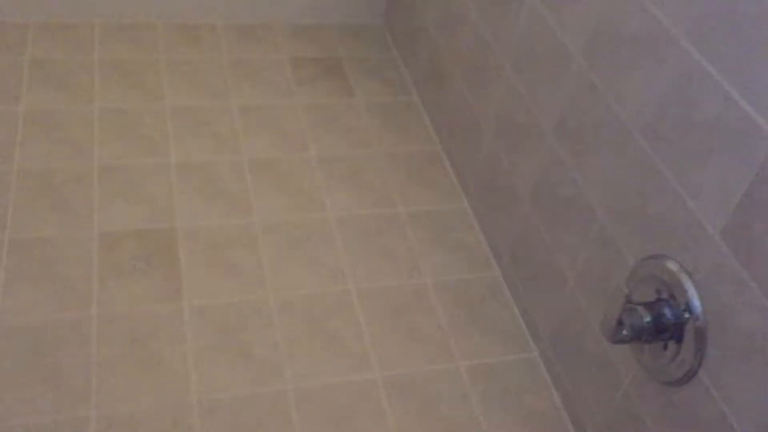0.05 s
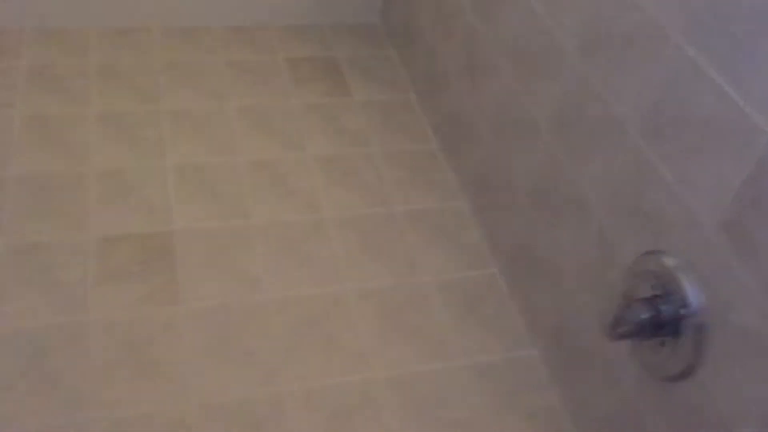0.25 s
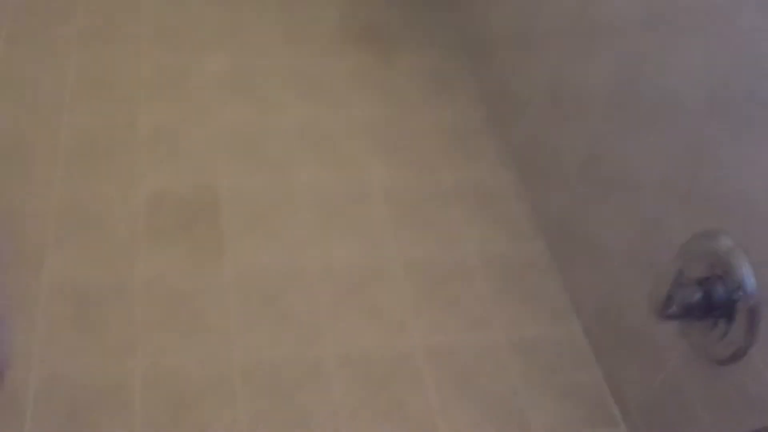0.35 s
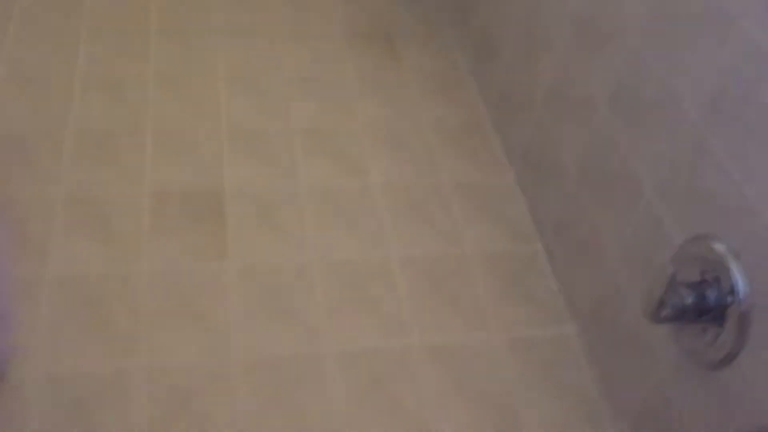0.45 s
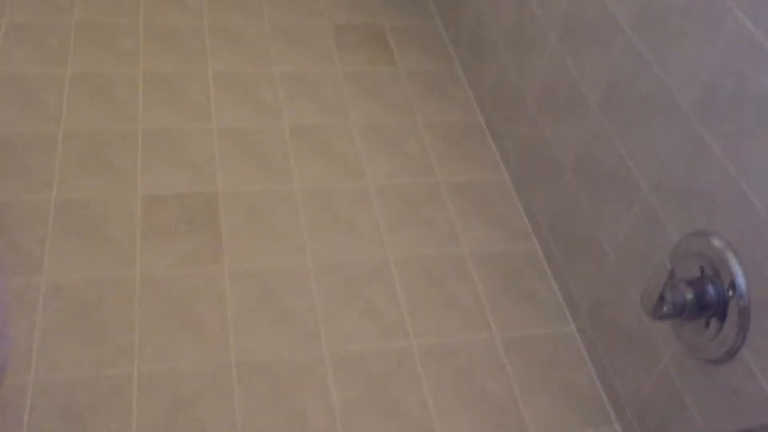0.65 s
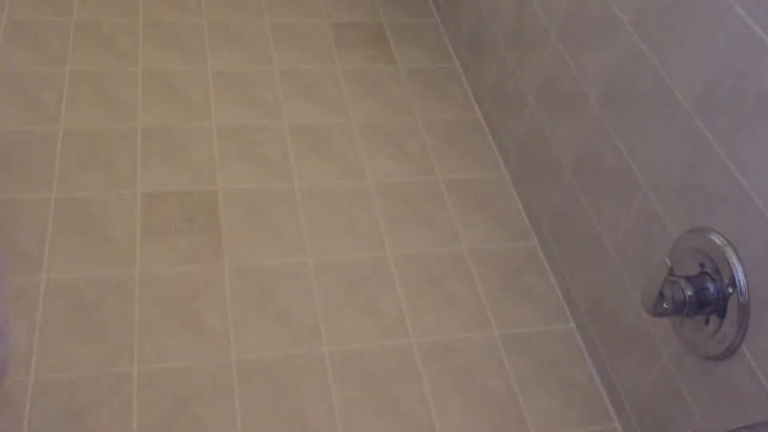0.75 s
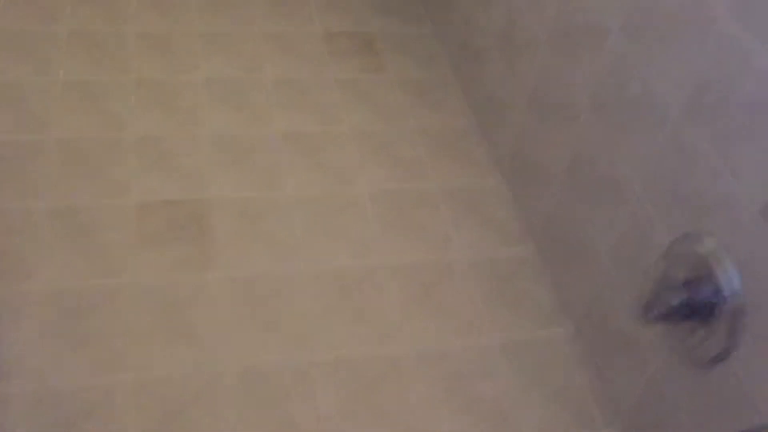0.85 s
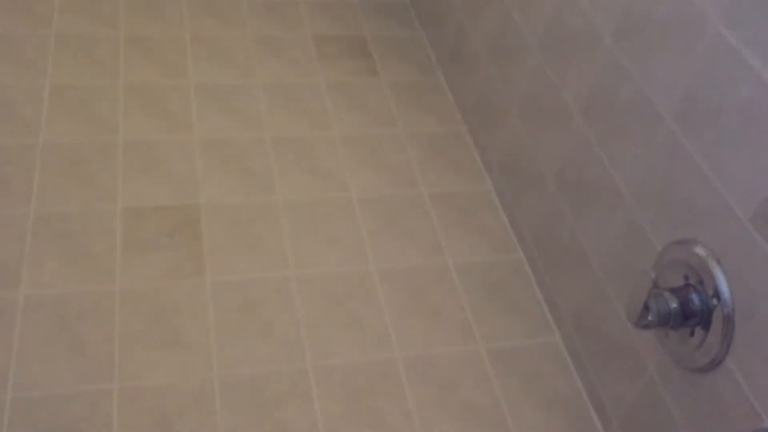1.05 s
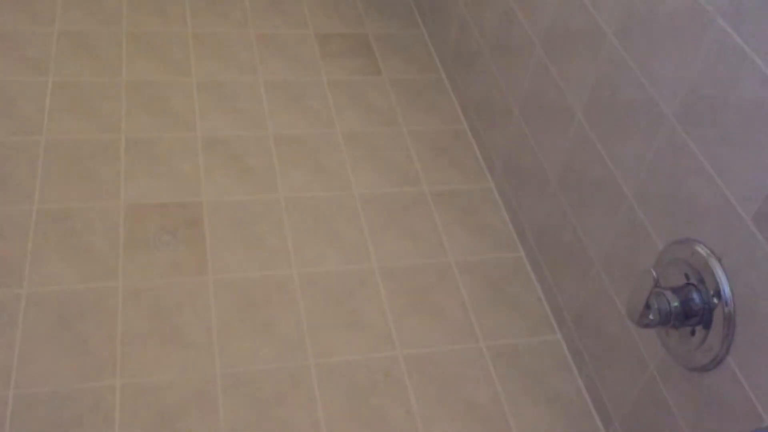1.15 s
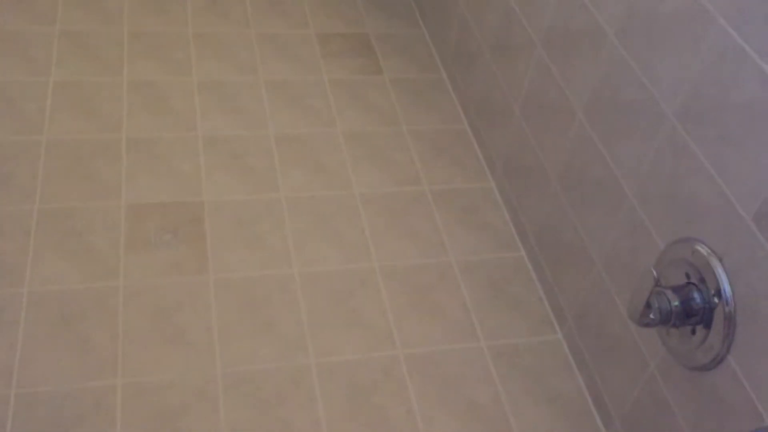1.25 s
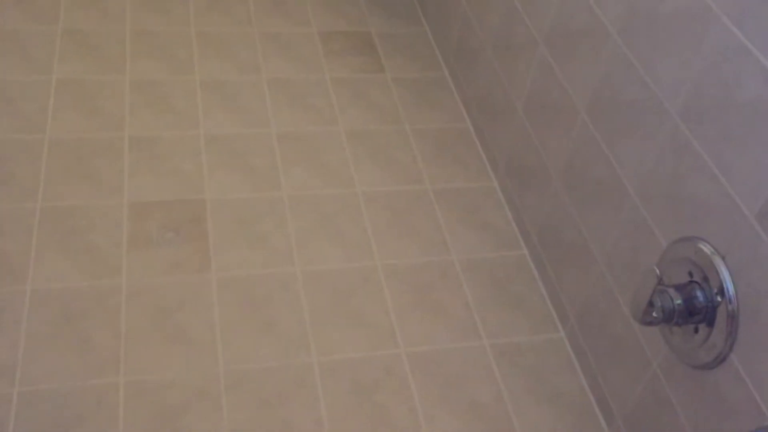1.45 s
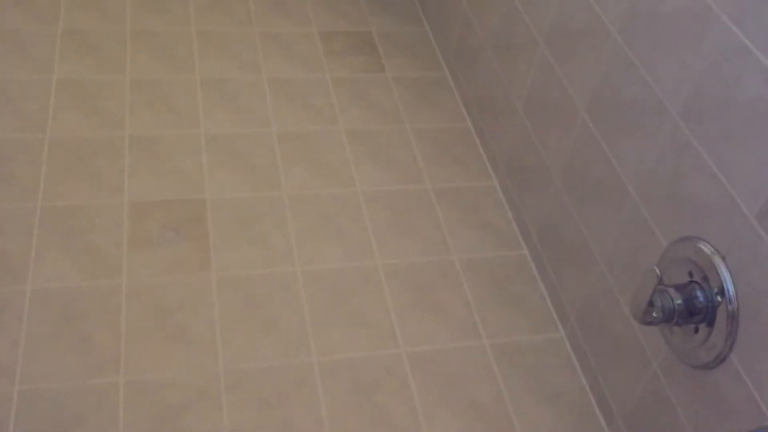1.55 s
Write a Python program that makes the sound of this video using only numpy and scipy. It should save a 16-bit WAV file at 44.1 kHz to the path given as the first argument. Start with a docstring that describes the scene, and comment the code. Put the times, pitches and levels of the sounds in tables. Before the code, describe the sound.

A phone case is bumped and set down, a hard double knock, then one echoing tap

```python
"""Knocks on the case of a hand-held phone, shifted and propped up in a small tiled room: short pushes ring its modes.
Sine bursts make dull bumps and hollow tones; filtered noise makes short gritty bursts, dry ticks and hard taps.
The taps, and more faintly the knocks and ticks, also excite a dense echo of decaying noise bands, the tiles.
Under it lie a steady hiss, a rumble whose level flickers, and a faint broad hiss that comes and goes."""
import sys
import numpy as np
from scipy import signal
from scipy.fft import rfft, irfft
from scipy.io import wavfile
from scipy.ndimage import uniform_filter1d

SR = 44100
rng = np.random.default_rng(int(sys.argv[2]) if len(sys.argv) > 2 else 0)


def generate_wav(sig):
    """Save sig (samples, or channels by samples) to the path in sys.argv[1] as 16-bit PCM at SR."""
    pcm = np.round(np.clip(np.atleast_2d(sig).T, -1, 1) * 32767).astype(np.int16)
    wavfile.write(sys.argv[1], SR, pcm)


N = 70560
T = np.arange(N) / SR  # time [s]


def undb(db):
    """Level to amplitude: 20 dB is a factor of ten."""
    return 10 ** (np.asarray(db) / 20)


def add(out, start_s, x):
    """Superposition: mix x into out from the given time."""
    i = int(start_s * SR)
    out[i:i + len(x)] += x[:N - i]


def peak(x, hz, width_hz):
    """Second-order resonance with gain 1 at its centre."""
    quality = hz / min(width_hz, 15000)
    return signal.lfilter(*signal.iirpeak(hz, quality, fs=SR), x)


def coloured(table):
    """Spectral shaping: white noise weighted by (frequency [Hz], level [dB]) points, scaled to rms 1."""
    top_hz = 15850
    hz, db = np.array(table).T
    f = np.arange(N // 2 + 1) * SR / N + 1  # the 1 keeps the logarithm finite
    gain = undb(np.interp(np.log(f), np.log(hz), db)) * (f < top_hz)
    x = irfft(rfft(rng.standard_normal(N)) * gain, N)
    return x / x.std()


def walk(rate_hz):
    """Random wander of spread 1: white noise smoothed by two moving averages."""
    window = int(SR / rate_hz)
    x = uniform_filter1d(uniform_filter1d(rng.standard_normal(N), window), window)
    return x / x.std()


def sine_bursts(table, rise, exponent=1):
    """Amplitude modulation: a quarter-sine rise over a share of each length, then a quarter-sine fall."""
    out = np.zeros(N)
    for start_s, length_s, hz, db in table:
        t = T[:int(length_s * SR)]
        u = t / length_s
        envelope = np.sin(np.pi / 2 * np.minimum(u / rise, (1 - u) / (1 - rise))) ** exponent
        add(out, start_s, undb(db) * envelope * np.sin(2 * np.pi * hz * t))
    return out


def background():
    """Stationary noise: hiss over a randomly modulated low band, plus a faint hiss on its own level curve."""
    # steady noise spectrum: (frequency [Hz], relative level [dB])
    floor_colour = [(12, -15), (20, -15), (81, 1), (143, -3), (200, -2.5), (370, -14.5), (563, -14),
                    (648, -17), (908, -20), (1640, -24), (2110, -25), (12300, -32.5), (16300, -33)]
    # faint hiss spectrum: (frequency [Hz], relative level [dB])
    hiss_colour = [(300, -24), (1000, 5), (3000, 2.5), (7000, -4.5), (9500, -7.5), (11000, -21),
                   (16000, -13)]
    # faint hiss over time, before a small wander: (time [s], rms level [dB])
    hiss_level = [(0, -71.5), (.12, -75), (.19, -74.5), (.6, -77.5), (.96, -76.5), (1.02, -72), (1.12, -70),
                  (1.3, -73), (1.45, -76), (1.6, -74.5)]
    floor_db, flicker_db = -66, 2.5
    steady = coloured(floor_colour) * undb(floor_db)
    rumble = signal.sosfiltfilt(signal.butter(2, 330, fs=SR, output="sos"), steady)
    flickering = rumble * undb(flicker_db * walk(53))
    hiss_db = np.interp(T, *np.array(hiss_level).T) + 0.5 * walk(41)
    return steady - rumble + flickering + coloured(hiss_colour) * undb(hiss_db)


def bumps():
    """Heavily damped motion: dull bumps of hand and support, most lasting only a few cycles."""
    # bumps: (start [s], length [s], pitch [Hz], peak level [dB])
    bump_table = [(.2251, 0.02, 258.7, -22.5), (.25, 0.031, 252, -45), (.276, 0.024, 250, -42),
                  (.226, 0.032, 119.5, -29.5), (.405, 0.012, 369, -44.5), (.41, 0.053, 100.4, -59.5),
                  (.496, .016, 104.5, -45.5), (.508, 0.034, 214, -49.5), (.52, 0.023, 59, -52),
                  (.7, 0.024, 206, -57), (.9, 0.061, 200.7, -47), (.911, 0.034, 184.4, -42.5),
                  (.925, 0.027, 95, -49), (.94, .045, 49, -53.5), (1.1625, 0.008, 187, -31.5),
                  (1.167, 0.064, 92.6, -53), (1.22, 0.086, 104.3, -57), (1.4137, 0.013, 150, -37.5),
                  (1.4205, 0.028, 91.5, -42.5), (1.44, 0.09, 41.7, -67), (.03, 0.041, 109, -59.5),
                  (1.02, 0.014, 118.5, -58.5), (1.08, 0.024, 101, -76), (1.535, 0.021, 99, -54.5)]
    return sine_bursts(bump_table, rise=.26)


def gritty_bursts():
    """Band-filtered granular noise: short bursts, for scuffs and the noisy attacks of knocks and taps."""
    # gritty bursts: (start [s], length [s], rms level before the envelope [dB], centre [Hz], width [Hz])
    burst_table = [(.2045, .011, -47, 2550, 700), (.2045, .012, -50, 4500, 1000),
                   (.2045, .014, -54, 6500, 3000), (.223, .005, -52, 2000, 2000),
                   (.8972, .006, -51, 1700, 1000), (.901, .008, -60, 1700, 900),
                   (.9095, .012, -59, 1900, 1200), (1.1618, .006, -45, 5000, 600),
                   (1.411, .004, -54, 1750, 400), (1.4108, .005, -57, 5100, 700),
                   (1.415, .02, -64, 4400, 1500), (1.412, .022, -61, 1100, 120),
                   (.8975, .004, -64, 3900, 1500), (.21, .04, -60, 3500, 4000),
                   (.214, .035, -63, 6500, 1500), (.18, .03, -60, 400, 500), (.205, .04, -42, 550, 250),
                   (.272, .03, -60, 550, 120), (.25, .05, -66, 1000, 800), (.39, .04, -62, 550, 500),
                   (.42, .07, -62, 230, 200), (.505, .035, -64, 400, 500), (.911, .026, -54, 750, 600),
                   (1.29, .055, -68, 2200, 2500), (1.19, .09, -62, 240, 150), (1.43, .05, -62, 260, 200)]
    grains_per_s, grain_spread_db = 4000, 1.2
    out = np.zeros(N)
    draws = rng.random((len(burst_table), 3, 4000))
    for (start_s, length_s, db, hz, width_hz), (noise, pick, size) in zip(burst_table, draws):
        # dense grains of slightly varied size stand out of a weak steady noise
        grain_size = undb(-grain_spread_db * np.log(size + 1e-9))
        grains = (noise - .5) * (.3 + (pick < grains_per_s / SR) * 3 * grain_size)
        x = peak(grains, hz, width_hz)
        x = peak(peak(x, hz, 2 * width_hz), hz, 2 * width_hz)
        u = T[:4000] / length_s
        envelope = np.clip(np.minimum(u / .25, (1 - u) / .75), 0, 1)  # quick to rise, slower to fall
        add(out, start_s, undb(db) * x / x.std() * envelope)
    return out


def knocks():
    """Modal excitation: raised-cosine pushes ring the modes of the case; a longer contact is duller."""
    # knocks on the case: (time [s], push level [dB], contact [ms])
    knock_table = [(0.193, -34.5, 2), (0.205, -21, 0.69), (0.2078, -15.5, 1.17), (0.2126, -27, 1.98),
                   (0.2232, -23, 0.74), (0.2259, -19, 1.6), (0.9103, -39, 1.6), (0.925, -50.5, 0.61)]
    # modes of the case: (frequency [Hz], relative level [dB], 60 dB decay time [s])
    case_modes = [(112, -28, 0.2), (210, -16, 0.0067), (271.8, -3, 0.052), (460, -6.5, 0.016),
                  (528, -18.5, 0.053), (790, -6.5, 0.024), (939, -20.5, 0.058), (1080, -10, 0.015),
                  (1300, -5, 0.0064), (1626, -19.5, 0.046), (2600, -38, 0.017), (3600, -23, 0.024),
                  (2462, -4, 0.048), (4400, -24, .025), (6200, -28, .02)]
    push, t = np.zeros(N), T[:SR // 2]
    for start_s, db, contact_ms in knock_table:
        pulse = np.hanning(max(int(contact_ms * SR / 1000), 1) + 2)
        add(push, start_s, -undb(db) * pulse / pulse.sum())
    ring = sum(undb(db - 60 * t / t60) * np.sin(2 * np.pi * hz * t) for hz, db, t60 in case_modes)
    high_pass = signal.butter(2, 94, "high", fs=SR, output="sos")
    return signal.sosfilt(high_pass, signal.fftconvolve(push, ring)[:N])


def tiles(x):
    """Reverberation: convolution with noise bands, each decaying at its own rate after a quick build-up."""
    # echo bands: (centre [Hz], relative level [dB], 60 dB decay time [s])
    echo_bands = [(457, 1, 0.17), (1310, 1.5, 0.21), (2160, 4.5, 0.2), (3880, -2, 0.26), (6800, 13, 0.17),
                  (10300, -2, 0.079), (14600, 3, 0.12)]
    start_s, rise_s = .002, .009
    t = T[:SR // 2]
    tail = np.zeros(len(t))
    for hz, db, t60 in echo_bands:
        band = peak(peak(rng.standard_normal(len(t)), hz, hz * 1.16), hz, hz)
        tail += band / np.sqrt(hz) * undb(db - 60 * t / t60)  # the root offsets the wider upper bands
    tail *= np.clip((t - start_s) / rise_s, 0, 1)
    return signal.fftconvolve(x, tail / np.sqrt(np.sum(tail ** 2)))[:N]


def ticks():
    """Impulsive excitation: very short decaying noise through a band makes small dry ticks of the case."""
    # ticks: (time [s], peak level [dB], centre [Hz])
    tick_table = [(.2078, -37, 8500), (.208, -35, 13500), (.2122, -46, 4300), (.2264, -41, 8000),
                  (.2264, -43, 13500), (.3975, -61, 11000), (.4195, -57, 12500), (.4304, -55, 13500),
                  (.4548, -60, 13000), (.4672, -58, 13500), (.4978, -60, 14000), (.5105, -65, 4000),
                  (.5162, -59, 4000), (.6592, -53, 13500), (.94, -64, 13000), (1.3132, -52, 2500),
                  (.801, -61, 1350), (.814, -59, 1350)]
    decay_ms, relative_width = .8, .55
    out, t = np.zeros(N), T[:400]
    draws = rng.standard_normal((len(tick_table), 400))
    for (start_s, db, hz), noise in zip(tick_table, draws):
        burst = noise * np.exp(-t * 1000 / decay_ms)
        x = peak(peak(burst, hz, hz * relative_width), hz, hz)
        add(out, start_s, undb(db) * x / np.abs(x).max())
    return out


def hums():
    """Amplitude-modulated tones: hollow hums whose swell has a flattened top."""
    # hums: (start [s], length [s], pitch [Hz], peak level [dB])
    hum_table = [(.262, .125, 263, -49), (1.163, .112, 530, -52), (1.337, .024, 540, -61)]
    return sine_bursts(hum_table, rise=.34, exponent=.5)  # an exponent under 1 flattens the top


def taps():
    """Source and filter: an even clatter excites fixed resonances; returns direct sound and echo send."""
    # hard taps heard through the air:
    # (time [s], root-two times rms over the clatter [dB], clatter [ms], brightness [Hz], echo send [dB])
    tap_table = [(1.1619, -34, 4, 12000, -1.5), (1.297, -66, 8, 1500, -10), (1.338, -66, 6, 2000, -10),
                 (1.4111, -52, 2.2, 6000, -8), (1.4195, -57, 2.5, 6000, -8)]
    # resonances of the tapped thing: (frequency [Hz], width [Hz], relative level [dB])
    tapped_modes = [(242, 54, 8), (495, 15.4, 5.5), (970, 72, -34), (1120, 82, 7), (1290, 46, 5),
                    (1806, 147, 1), (1910, 166, -0.5), (2655, 320, -2), (3154, 140, 2.5), (3317, 380, 2.5),
                    (4010, 250, -1), (5070, 350, -2), (7010, 1160, -14), (8730, 3600, -17.5),
                    (13500, 10000, -21)]
    direct, send, t = np.zeros(N), np.zeros(N), T[:4000]
    draws = rng.standard_normal((len(tap_table), 4000))
    for (start_s, db, clatter_ms, bright_hz, echo_db), noise in zip(tap_table, draws):
        spectrum = rfft(noise * np.exp(-(t * 1000 / clatter_ms) ** 2))
        # flatten the spectrum so that no band is left out
        spectrum = spectrum / np.sqrt(uniform_filter1d(np.abs(spectrum) ** 2, size=30))
        clatter = irfft(spectrum) * (t < .04)
        clatter = signal.sosfilt(signal.butter(2, bright_hz, fs=SR, output="sos"), clatter)
        x = sum(undb(mode_db) * peak(peak(clatter, hz, width_hz), hz, 4 * width_hz)
                for hz, width_hz, mode_db in tapped_modes)
        x *= undb(db) / np.sqrt(2 * np.mean(x[:int(clatter_ms * SR / 1000)] ** 2))
        add(direct, start_s, x)
        add(send, start_s, x * undb(echo_db))
    return direct, send


def scene():
    """Superposition of the sources and the echo that the case and the taps excite."""
    case_echo_db = -17.5
    case = knocks() + ticks()
    tap, tap_send = taps()
    echo = tiles(tap_send + undb(case_echo_db) * case)
    return (background() + bumps() + gritty_bursts() + case + hums() + tap + echo)[None]


def record(dry):
    """Band limiting: a steep elliptic low-pass closes the top of the band."""
    top_hz = 16400
    return signal.sosfilt(signal.ellip(10, .2, 60, top_hz, fs=SR, output="sos"), dry)


dry = scene()
out = record(dry)
generate_wav(out)
```